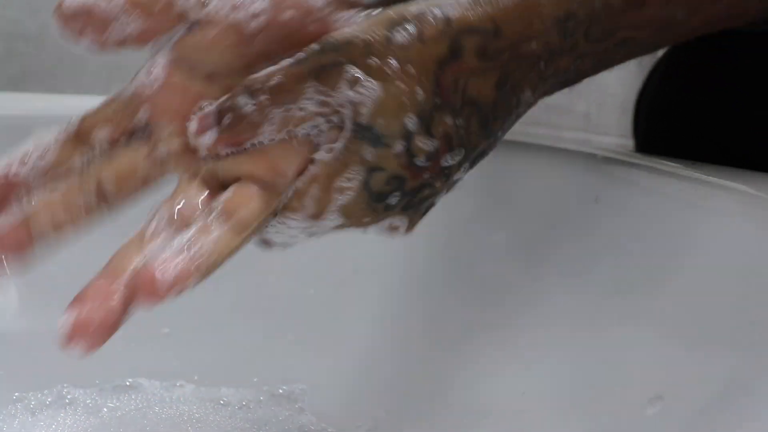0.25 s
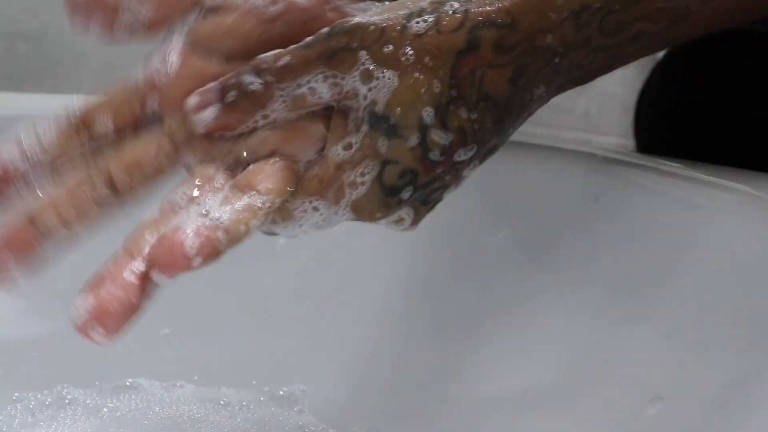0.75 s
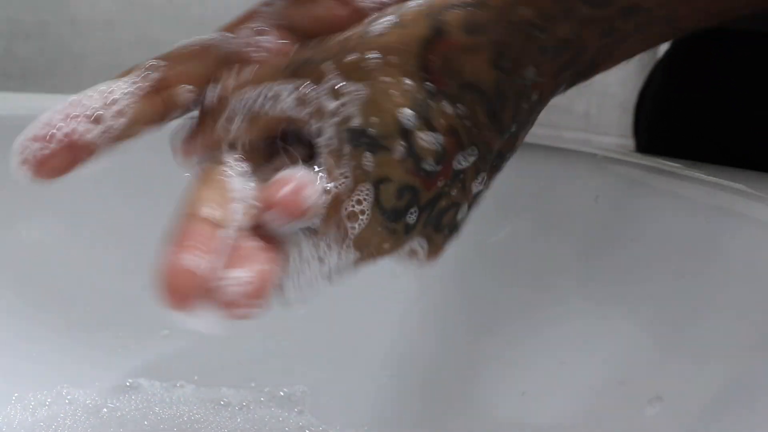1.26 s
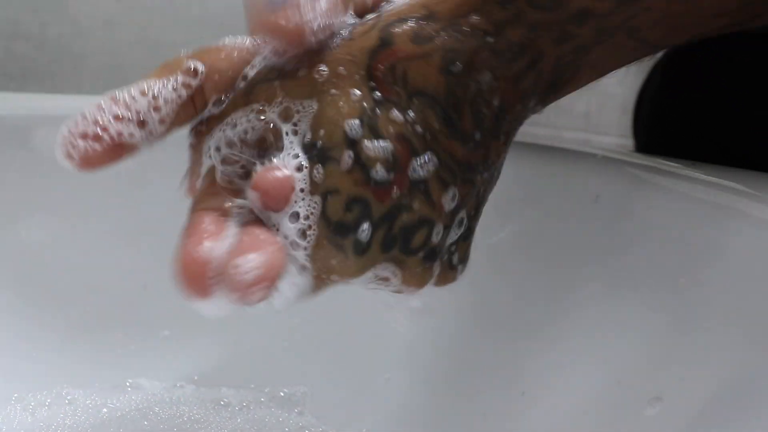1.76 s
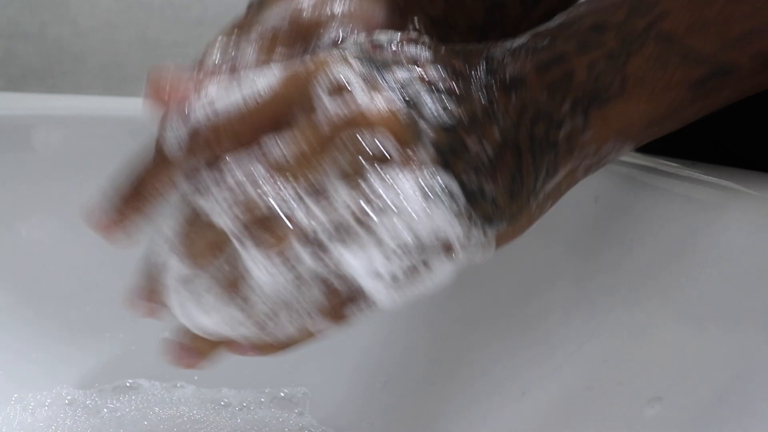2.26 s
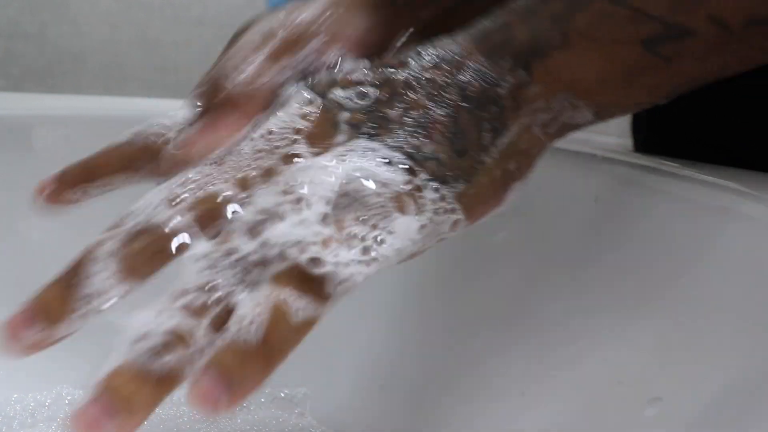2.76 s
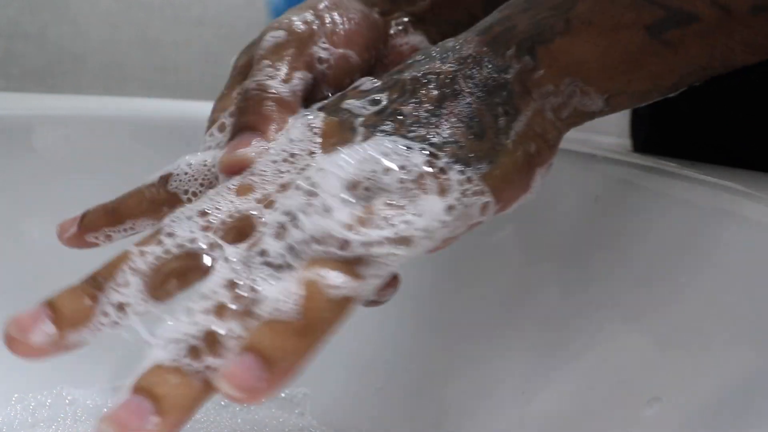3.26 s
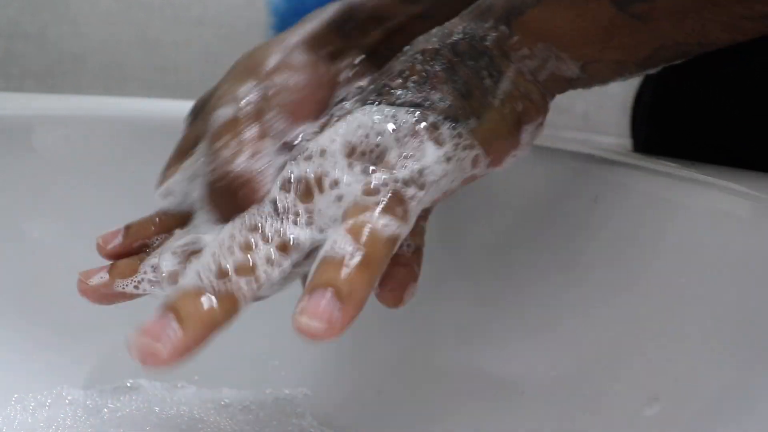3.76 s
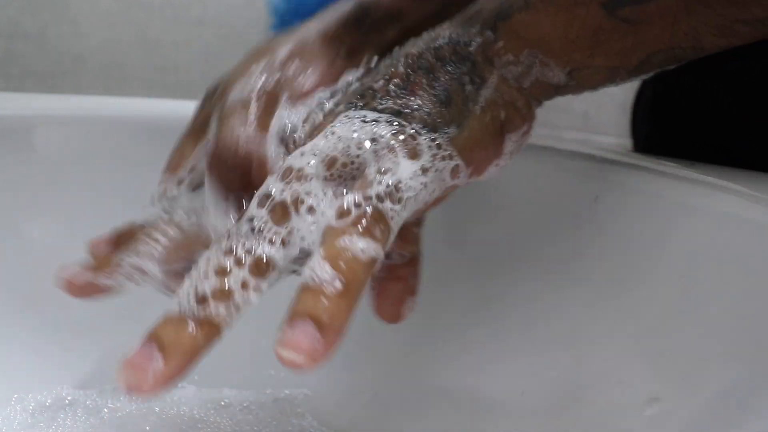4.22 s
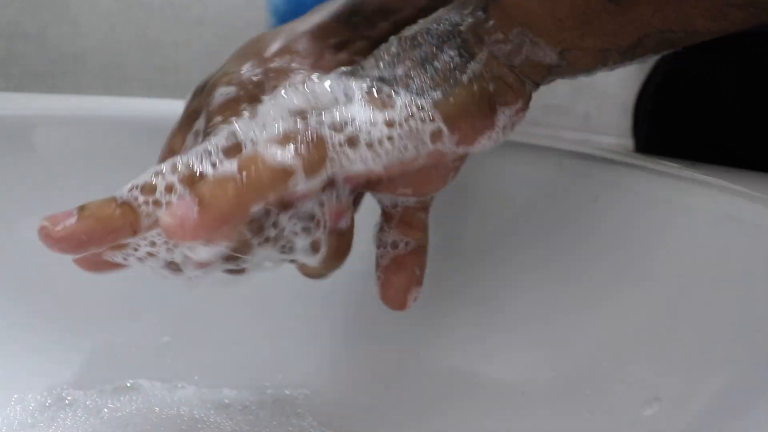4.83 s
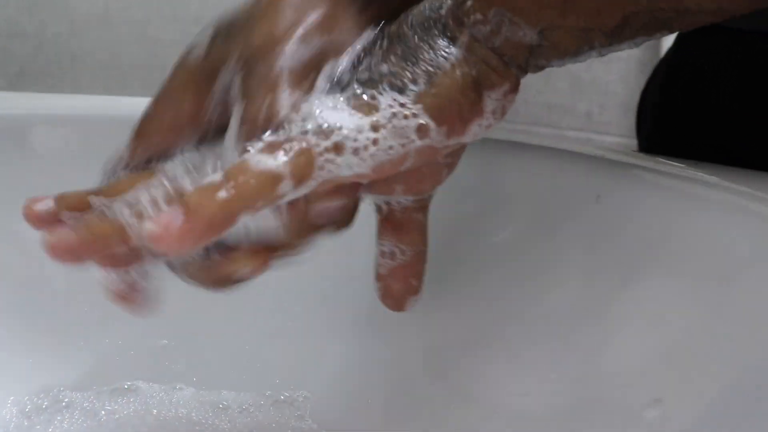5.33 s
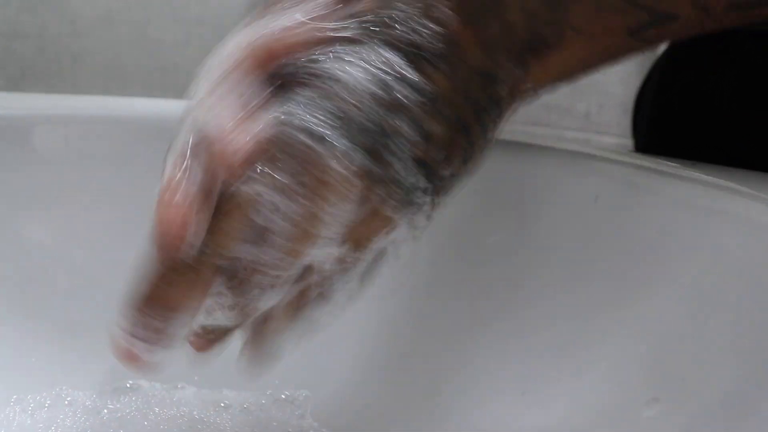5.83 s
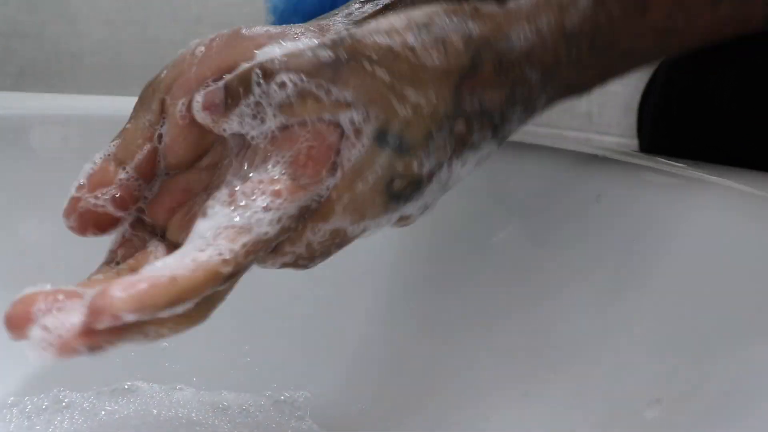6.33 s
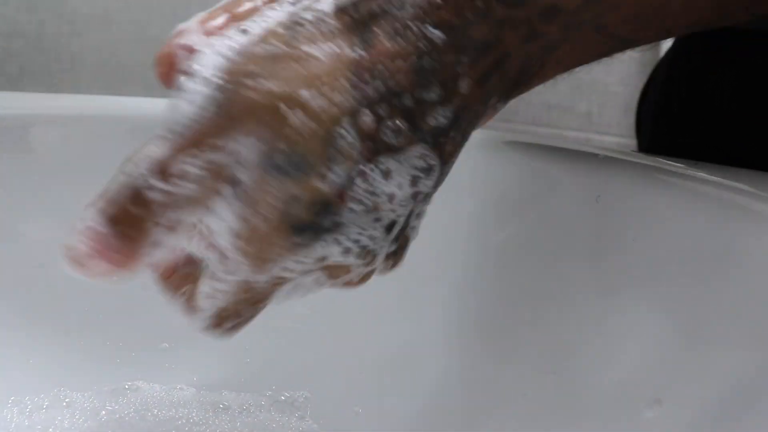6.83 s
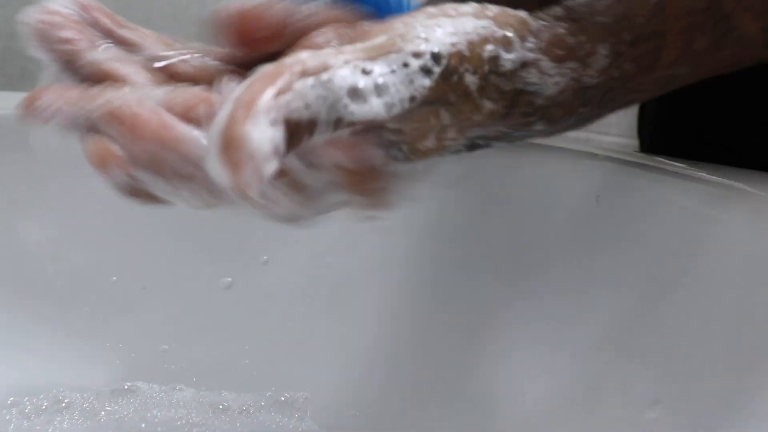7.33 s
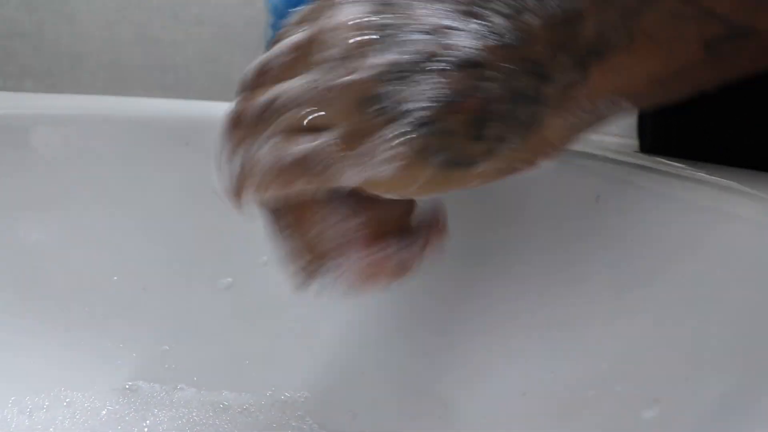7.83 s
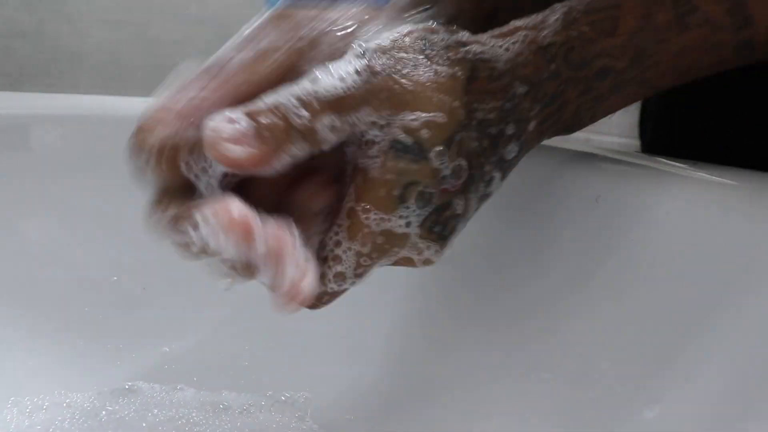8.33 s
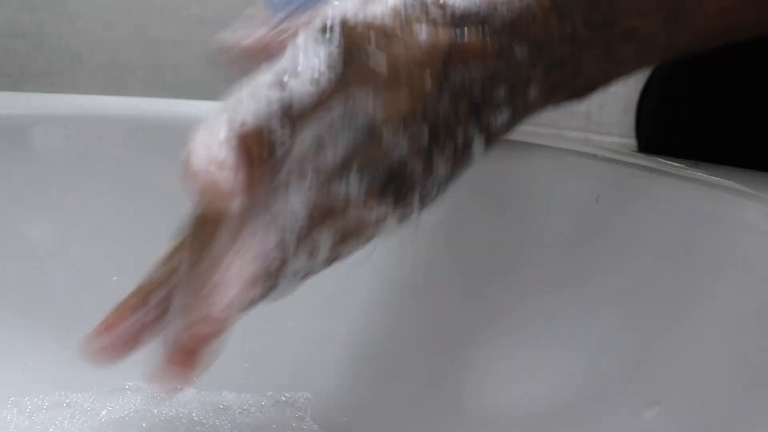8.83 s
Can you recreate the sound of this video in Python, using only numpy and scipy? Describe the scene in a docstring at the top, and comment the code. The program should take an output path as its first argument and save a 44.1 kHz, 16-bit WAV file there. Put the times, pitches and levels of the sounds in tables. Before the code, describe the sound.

Wet skin slides on skin, thick with foam. At first isolated loud squelchy pops stand out over light fizzing rubs, then a cluster of squishes mid-way, and finally fast, stronger scrubbing strokes with dense swish and hollow palm gurgles. Close microphone, with occasional low soft puffs of air, slight basin resonance, a short bright room and a barely audible hum.

```python
"""Soapy hand washing

Wet, soapy hands rub together over a washbasin, close to the microphone.
Air pockets between palms and fingers burst in short squelches: volleys of clicks ring resonators.
Stroke force sets the level of crackling lather, swishing skin and small random pockets; strokes grow
brisk in the last third. Noise puffs waft at the microphone; basin and small hard room ring over a quiet hum.
"""
import sys
import numpy as np
from scipy import signal
from scipy.fft import rfft, irfft, next_fast_len
from scipy.io import wavfile
from scipy.ndimage import map_coordinates

SR = 44100
rng = np.random.default_rng(int(sys.argv[2]) if len(sys.argv) > 2 else 0)


def master(y):
    """Save y as 16-bit WAV."""
    cut = np.clip(np.atleast_2d(y).T, -1, 1)
    pcm = np.round(cut * 32767)  # scale
    wavfile.write(sys.argv[1], SR, pcm.astype(np.int16))


N = 400428

# one hand sliding over the other: (middle [s], length [s], force [dB], brightness [dB])
STROKE_TABLE = [(.005, .025, -41, -0.5), (0.206, .15, -47.5, -0.5), (0.493, .11, -48, -2),
                (.67, 0.025, -47, -9), (0.774, 0.057, -44.5, 3.5), (.98, .05, -49.5, 2),
                (1.169, 0.11, -47, -9), (1.432, .17, -45.5, -3.5), (1.675, 0.089, -47, -3),
                (1.852, 0.12, -45, -3.5), (1.973, .025, -49.5, -15), (2.153, 0.1, -57, -1.5),
                (2.339, .04, -45.5, -6.5), (2.455, 0.049, -44.5, -1.5), (2.647, .08, -59.5, -8),
                (2.867, .04, -46, -3.5), (3.232, 0.062, -54.5, -4), (3.463, 0.13, -60.5, -3.5),
                (3.631, .06, -52.5, -1), (3.737, 0.0338, -43.5, -11.5), (3.986, 0.062, -49, -5),
                (4.168, .04, -44.5, -12), (4.517, 0.039, -38.5, -12), (4.681, 0.16, -47.5, -9),
                (4.835, 0.07, -48, -1.5), (5.111, .1, -48.5, -5), (5.272, 0.14, -58, 0),
                (5.615, 0.026, -59, 5), (5.742, .07, -50.5, 2.5), (5.899, 0.068, -51.5, 4),
                (5.942, 0.027, -38.5, 4), (6.103, 0.14, -53.5, 1), (6.309, .06, -40.5, 1.5),
                (6.541, 0.077, -47, 0.5), (6.787, .1, -36, -2), (7.079, .13, -38.5, -3.5),
                (7.307, .09, -44.5, -2), (7.445, .07, -46, -0.5), (7.53, .08, -52.5, 0),
                (7.635, .06, -39, -3.5), (7.726, .08, -38.5, -1), (7.874, .09, -39.5, -1.5),
                (7.953, .05, -36.5, -8), (8.082, .17, -41.5, -5.5), (8.245, .12, -38.5, -3),
                (8.496, .055, -36, -1), (8.638, .085, -42, -0.5), (8.788, 0.049, -40.5, -1.5),
                (8.913, 0.03, -34.5, -3.5), (9.033, 0.057, -40.5, -2.5)]
# relative spectrum of moving air: (frequency [Hz], density [dB])
PUFF_SPECTRUM = [(15, -12), (40, -14), (90, -6), (170, 1), (280, -12), (450, -6), (900, -41)]
# relative spectrum of a snapping film: (frequency [Hz], density [dB])
TICK_SPECTRUM = [(300, -31), (900, 12.5), (2500, -9), (4200, 3), (8500, 12), (10000, -6), (16000, -21)]


def amp(db):
    """Decibels to gain."""
    return 10 ** (np.asarray(db) / 20)


def unit(x):
    """Scale to rms 1."""
    return x / np.sqrt(np.mean(x ** 2) + 1e-20)


def along(points, hz):
    """Interpolate (Hz, value) points on a log frequency axis."""
    f, v = np.transpose(points)
    return np.interp(np.log(hz + 1), np.log(f + 1), v)


def wobble(knots_per_s):
    """Smooth random curve: spline through normal draws."""
    knots = rng.standard_normal(int(N * knots_per_s / SR) + 4)
    return map_coordinates(knots, [np.arange(N) * knots_per_s / SR])


def filtered(x, response):
    """Multiply the zero-padded spectrum of x by a function of frequency."""
    n = x.shape[-1]
    padded = 2 * next_fast_len(n // 2 + min(n, 8192))
    return irfft(rfft(x, padded) * response(np.fft.rfftfreq(padded, 1 / SR)), padded)[..., :n]


def colour(points):
    """Minimum-phase, hence causal, response with the given (Hz, dB) spectrum."""
    def response(hz):
        cepstrum = irfft(np.log(amp(along(points, hz))))
        # fold negative time onto positive time
        cepstrum[1:len(hz) - 1] *= 2
        cepstrum[len(hz):] = 0
        return np.exp(rfft(cepstrum))
    return response


def shaped_noise(spectrum):
    """Steady noise with the given (Hz, dB) spectrum, rms 1."""
    return unit(filtered(rng.standard_normal(N), lambda hz: amp(along(spectrum, hz))))


def resonance(hz, centre_hz, width_hz):
    """Causal band-pass resonance, peak gain 1."""
    return 1j * hz * width_hz / (centre_hz ** 2 - hz ** 2 + 1j * hz * width_hz)


def add(track, sound, start_s):
    """Mix a sound into the track."""
    start = max(round(start_s * SR), 0)
    part = track[start:start + len(sound)]
    part += sound[:len(part)]


def swell(level_db, middle_s, length_s, step=64):
    """Gain per sample of overlapping bell-shaped swells; length is full width at half power."""
    t = np.arange(0, N + step, step)[:, None] / SR
    bells = .5 ** ((2 * (t - middle_s) / length_s) ** 2)
    power = np.sum(amp(level_db) ** 2 * bells, axis=1)
    return np.interp(np.arange(N) / SR, t[:, 0], np.sqrt(power))


def background(air_db, hum_db):
    """Still room air, also ringing the basin, and a faint 120 Hz mains hum of wandering phase."""
    # relative spectrum of the quiet room: (frequency [Hz], density [dB])
    air_spectrum = [(20, -1.5), (45, -2), (170, -3), (300, -2.5), (500, -9.5), (1300, -14), (4000, -18),
                    (8000, -18), (15000, -22.5)]
    air = shaped_noise(air_spectrum)
    hum = unit(np.sin(2 * np.pi * 120 * np.arange(N) / SR + .25 * wobble(3.78)))
    return amp(air_db) * (air + amp(-1.5) * basin(air)) + amp(hum_db) * hum


def room(x, build_s, count=24):
    """Hard walls: a decaying noise tail, redrawn for each of count spans as the hands move."""
    # reverberation: (frequency [Hz], 60 dB decay time [s])
    decay_times = [(150, 1), (400, 0.23), (1000, 0.42), (2300, 0.23), (6000, 0.26), (14000, 0.18)]
    out = np.zeros(N)
    edges = np.linspace(0, N, count + 1).astype(int)
    for start, end in zip(edges, edges[1:]):
        hz, t, z = signal.stft(rng.standard_normal(SR // 2), SR, nperseg=256)
        decay = amp(-60 * t / along(decay_times, hz)[:, None])
        tail = signal.istft(z * decay, SR, nperseg=256)[1]
        tail *= 1 - np.exp(-np.arange(len(tail)) / SR / build_s)
        add(out, signal.fftconvolve(x[start:end], tail / np.linalg.norm(tail)), start / SR)
    return out


def basin(x):
    """The bowl under the hands: parallel resonances at a few pitches."""
    # bowl modes: (frequency [Hz], width [Hz], relative level [dB])
    modes = [(352.7, 7.4, 4), (431, 37, -0.5), (625.6, 16.4, 1), (835, 30, 0.5), (1123, 58, -1)]
    return filtered(x, lambda hz: sum(amp(db) * resonance(hz, centre, width) for centre, width, db in modes))


def wafted_air():
    """Wider sweeps push air at the microphone: low noise in swells."""
    # puffs: (middle [s], length [s], relative level [dB])
    puff_events = [(0.214, 0.043, -56), (1.943, 0.014, -59), (2.468, 0.059, -56), (2.864, .03, -53),
                   (4.805, 0.42, -56), (5.97, 0.063, -55), (6.83, 0.049, -48), (7.344, 0.064, -58),
                   (8.124, 0.303, -50), (8.366, 0.018, -37), (8.693, 0.024, -46)]
    middle_s, length_s, level_db = np.transpose(puff_events)
    return swell(level_db, middle_s, length_s) * shaped_noise(PUFF_SPECTRUM)


def crackle(spectrum, pops_per_s, spread_db, clump_db, smooth):
    """Tiny bubbles popping in clumps over the smooth hiss of sliding skin; rms 1."""
    sizes = amp(spread_db * np.clip(rng.standard_normal(N), -3, 2.4))
    clumps = amp(clump_db * wobble(90))
    pops = (rng.random(N) < pops_per_s / SR) * rng.choice([-1, 1], N) * sizes * clumps
    smooth = np.clip(smooth, 0, 1)  # power share of the hiss
    source = np.sqrt(1 - smooth) * unit(pops) + np.sqrt(smooth) * rng.standard_normal(N)
    return unit(filtered(source, lambda hz: amp(along(spectrum, hz))))


def bubbles(pitch_hz, scatter_octaves, cycles, spread_db, count=2600, size=400):
    """Foam cells bursting, each a tiny decaying sine at its own pitch; rms 1."""
    when = rng.random((count, 1))
    tune, force = rng.standard_normal((2, count, 1))
    hz = np.minimum(pitch_hz * 2 ** (scatter_octaves * tune), SR / 4)
    phase = hz * np.arange(size) / SR  # in cycles
    rings = np.sin(2 * np.pi * phase) * phase * np.exp(-phase / cycles)
    rings *= amp(spread_db * np.minimum(force, 2))
    index = (when * N).astype(int) + np.arange(size)
    return unit(np.bincount(index.ravel(), rings.ravel(), N)[:N])


def stroke_gains():
    """Rub, lather and swish gains: foam follows the force fully, the hollow rub only in part."""
    usual_force_db, usual_rub_db, rub_db_per_force_db = -46, -51, 0.22
    middle_s, length_s, force_db, bright_db = np.transpose(STROKE_TABLE)
    rub_db = usual_rub_db + rub_db_per_force_db * (force_db - usual_force_db)
    return [swell(db, middle_s, length_s) for db in (rub_db, force_db, force_db + bright_db)]


def hollow_rub():
    """Large bubbles gurgle in the palm under a low crackle."""
    # relative spectrum of the rub: (frequency [Hz], density [dB])
    rub_spectrum = [(60, -45), (150, -1), (300, 1), (550, -6), (1000, 0), (1500, -11), (3000, -45)]
    gurgle = bubbles(pitch_hz=700, scatter_octaves=0.315, cycles=2.5, spread_db=0, count=900)
    rasp = crackle(rub_spectrum, pops_per_s=770, spread_db=-2.5, clump_db=9.0, smooth=0.25)
    return amp(-4.0) * gurgle + 0.46 * rasp


def lather_foam(lather_db, bubble_db, tick_db):
    """Foam crackles, its cells ring, and now and then a larger film snaps with a tick."""
    # relative spectrum of the foam: (frequency [Hz], density [dB])
    foam_spectrum = [(500, -1), (1000, -10), (1500, -1.5), (2400, 7), (3300, 5), (4500, -2.5),
                     (8000, -27.5)]
    pops = crackle(foam_spectrum, pops_per_s=630, spread_db=0.5, clump_db=-2, smooth=0.14)
    cells = bubbles(pitch_hz=2597, scatter_octaves=0.516, cycles=1.74, spread_db=3.0)
    ticks = crackle(TICK_SPECTRUM, pops_per_s=75, spread_db=9.5, clump_db=-5.5, smooth=0)
    return amp(lather_db) * pops + amp(bubble_db) * cells + amp(tick_db) * ticks


def skin_swish(swish_db, bubble_db):
    """Sliding skin hisses in the treble while the finest foam cells ring."""
    # relative spectrum of the swish: (frequency [Hz], density [dB])
    swish_spectrum = [(2000, 0), (3500, -16), (4600, 2), (6500, -0.5), (8500, 4.5), (10000, -11),
                      (13000, -5.5), (16000, -21)]
    hiss = crackle(swish_spectrum, pops_per_s=990, spread_db=4.5, clump_db=5.5, smooth=0.67)
    cells = bubbles(pitch_hz=5230, scatter_octaves=0.39, cycles=3.4, spread_db=-2)
    return amp(swish_db) * hiss + amp(bubble_db) * cells


def rubbing(rub_db, lather_db, bubble_db, tick_db, swish_db, puff_db):
    """Hands slide on lather: rub, foam and swish swell with every stroke, beside puffs of air."""
    catch_db, smooth_force_db = 4, -38.5  # light strokes stutter; above this force they glide
    rub, lather, swish = stroke_gains()
    # the skin catches and slips
    grip = amp(catch_db * wobble(45) / (1 + (lather / amp(smooth_force_db)) ** 2))
    sliding = rub * amp(rub_db) * hollow_rub()
    sliding += lather * lather_foam(lather_db, bubble_db, tick_db)
    sliding += swish * skin_swish(swish_db, bubble_db - 0.5)
    # lone films snap even in the lightest strokes
    strays = amp(-9.5) * crackle(TICK_SPECTRUM, pops_per_s=25, spread_db=-3.5, clump_db=-4.5, smooth=0)
    return grip * sliding + rub * strays + amp(puff_db) * wafted_air()


def ruptures(length_s, spread_db, films_per_s, lead, lead_db, size=3072, order=3):
    """Soap films tear in a volley of uneven clicks: a lead-in, a sudden burst, a few stragglers."""
    count = 12 + int(length_s * films_per_s)
    delay = rng.gamma(order, 1 / order, size)[:count] - 1  # skewed scatter around the middle
    early = np.arange(count) % 5 == 0  # every fifth click belongs to the lead-in
    when = np.clip(size / 2 + length_s * SR * (.38 * delay - lead * early), 0, size - 1)
    force = rng.choice([-1, 1], size) * amp(spread_db * rng.standard_normal(size))
    return np.bincount(when.astype(int), force[:count] * amp(lead_db * early), size)


def pocket(pitch_hz, q, overtone_db, muffle_hz):
    """Air trapped between wet skin: a main ring and two overtones, dulled by the soft walls."""
    def response(hz):
        main, second, third = (resonance(hz, k * pitch_hz, k * pitch_hz / q) ** 2 for k in (1, 2, 3))
        walls = 1 + 1j * hz / muffle_hz - (hz / muffle_hz) ** 2
        return (main + amp(overtone_db) * (second + third)) / walls
    return response


def small_squelches(count=110):
    """Little pockets give way at random while a hand slides, louder under a harder, wetter stroke."""
    typical_hz, scatter_octaves = 2430, 0.5
    typical_s, q = 0.0032, 1.6
    over_force_db, spread_db = 2, 3.6
    wetness = 0.75  # dull strokes are the wet ones: dB gained per dB of brightness lost
    parts_db = np.array([0, -10.5, -11])  # pocket, spray, palm
    middle_s, length_s, force_db, bright_db = np.transpose(STROKE_TABLE)
    level_db = force_db + over_force_db - wetness * bright_db
    # longer strokes shed more pockets
    place = (np.arange(count) + rng.random(count)) / count
    stroke = np.searchsorted(np.cumsum(length_s) / length_s.sum(), place)
    events = []
    for k, (when, span, tune, size) in zip(stroke, rng.standard_normal((count, 4))):
        time_s = middle_s[k] + 0.27 * length_s[k] * when
        pitch_hz = typical_hz * 2 ** (scatter_octaves * tune)
        levels_db = level_db[k] + spread_db * size + parts_db
        events.append((time_s, typical_s * 2 ** (.5 * span), pitch_hz, q, *levels_db))
    return events


def squelches(pocket_db, spray_db, palm_hz, palm_width_hz, glide_octaves):
    """Each volley rings a trapped air pocket, throws a fine spray and thumps the hollow of the palm."""
    # loud air pockets: (middle [s], length [s], pitch [Hz], Q [1],
    # relative levels of pocket [dB], spray [dB], cupped palm [dB])
    loud_pockets = [(.078, 0.0097, 2600, 1.1, -13, -20.5, -39.5), (.131, 0.0042, 2340, 1.5, -35, -33, -39),
                    (.149, 0.0025, 2360, 2.3, -16, -46, -41), (0.182, 0.0088, 1790, 0.59, -28, -31.5, -41),
                    (.279, 0.0077, 2040, 1.9, -42, -44, -40), (.438, 0.017, 477, 1.3, -36, -47, -55),
                    (.459, 0.013, 454, 0.7, -36.5, -38, -61), (0.488, .011, 480, 0.97, -42.5, -50, -53),
                    (0.529, 0.036, 2330, 1.17, -30.5, -46, -39), (.685, 0.0037, 2710, 7.5, -37, -43.5, -45),
                    (0.725, 0.0024, 3400, 4.2, -32, -29, -55), (.792, 0.0025, 2150, 2.3, -23, -43, -39),
                    (1.103, 0.0071, 2480, 1.1, -35.5, -42.5, -50),
                    (1.129, .012, 2050, 0.77, -36.5, -39.5, -46.5),
                    (1.175, 0.0098, 1610, 0.72, -35, -50, -50), (1.305, 0.011, 2620, 3.9, -13.5, -21, -40),
                    (1.657, 0.016, 4030, 2.3, -27, -30.5, -45.5),
                    (1.677, 0.021, 4170, 2.1, -30, -26, -43.5), (1.773, 0.0093, 2237, 13, -11, -25, -39),
                    (1.875, 0.02, 1790, 1.1, -37, -56, -43.5), (1.892, 0.0089, 1574, 5.15, -28, -43.5, -36),
                    (2.341, 0.0071, 1750, 2.8, -28, -37.5, -55),
                    (2.494, .008, 1740, 1.6, -39, -37.5, -45.5), (2.821, 0.012, 710, 3.3, -36, -59, -42),
                    (3.051, 0.0074, 2170, 1.7, -34.5, -48.5, -37.5),
                    (3.479, 0.009, 1080, 1.1, -37, -60, -65), (3.818, 0.011, 2700, 0.88, -16, -18, -19),
                    (4.153, 0.02, 1680, 0.75, -33.5, -39, -41.5),
                    (4.186, 0.0098, 2420, 1, -23.5, -55, -29.5), (4.217, 0.0066, 1800, 0.48, -21, -29, -65),
                    (4.253, 0.003, 3060, 1.5, -20.5, -30.5, -40),
                    (4.322, 0.0086, 1750, 0.48, -27, -70, -46), (4.353, .014, 1900, 0.78, -17.5, -45, -37),
                    (4.654, 0.011, 2480, 1.2, -26.5, -39, -41),
                    (4.839, .012, 3570, 0.66, -22.5, -22.5, -33),
                    (4.972, 0.0082, 1560, 0.66, -27.5, -38, -55),
                    (4.987, 0.011, 3020, 0.92, -17.5, -21.5, -27.5),
                    (5.352, 0.0028, 2900, 0.73, -29, -39, -41),
                    (5.418, 0.0072, 2050, 0.65, -17, -32, -35.5), (5.96, 0.0031, 1350, 2.6, -28, -26, -39),
                    (5.96, 0.0034, 13300, 3.7, -25, -57, -55),
                    (5.977, 0.013, 2480, 0.67, -31, -31.5, -41.5), (6.083, .008, 3160, .9, -44, -41.5, -49),
                    (6.123, .03, 633, 1.5, -54.5, -67, -62), (6.207, .005, 10000, 2, -44, -45, -55),
                    (6.333, 0.003, 3180, 4, -35, -26, -30), (6.467, 0.0016, 2880, 1.2, -29, -41, -35.5),
                    (6.553, 0.017, 2750, 0.78, -26.5, -31, -40.5),
                    (6.72, 0.012, 1520, 0.62, -25.5, -20.5, -46), (6.731, 0.0061, 7000, 1.1, -26, -40, -55),
                    (6.75, 0.0097, 2380, 5.2, -30, -31, -62), (6.836, .022, 480, 1.5, -30.5, -44, -56),
                    (6.958, 0.0054, 1780, 1.3, -27.5, -44, -59), (7.059, 0.013, 522, 3.3, -36.5, -58, -60),
                    (7.134, 0.0052, 2030, .45, -30, -48, -48),
                    (7.189, 0.0088, 2200, 2.2, -29.5, -51, -37.5),
                    (7.429, 0.0067, 1490, 3, -36.5, -57, -58), (7.491, 0.015, 2500, 0.73, -37.5, -48, -46),
                    (7.6, 0.011, 3270, 5, -44, -32.5, -57), (7.652, 0.0079, 3440, 0.83, -24, -31, -44),
                    (7.736, 0.0041, 3800, 0.44, -33, -26, -53),
                    (7.884, 0.0075, 2180, 0.55, -26.5, -49, -64), (7.993, 0.019, 830, 0.55, -29, -51, -49),
                    (8.235, .025, 2550, 0.85, -22.5, -42, -26), (8.252, 0.01, 2260, 0.58, -22.5, -34, -54),
                    (8.366, .007, 1010, 3.8, -34, -46, -28), (8.51, .008, 3130, 3.3, -34, -49, -32.5),
                    (8.672, 0.0068, 2340, 1.6, -21, -47, -30), (8.8, 0.015, 1440, 0.35, -27, -35, -48),
                    (8.82, 0.0076, 2260, 3.3, -28.5, -22, -39), (8.942, 0.014, 2880, 3.5, -31, -43, -38),
                    (9.002, .017, 668, 1.25, -35, -46, -55), (9.037, 0.011, 1600, 0.96, -25.5, -47, -47),
                    (9.051, 0.015, 1360, 3.7, -37, -28, -46)]
    # relative spectrum of the spray: (frequency [Hz], density [dB])
    spray_spectrum = [(200, -81), (500, -8.5), (2000, 6), (4000, 14.5), (8500, 8.5), (10000, -3.5),
                      (13000, -5.5), (16000, -16)]
    seal_db = 16  # tightly sealed pockets burst unannounced: lead-in lost per doubling of Q
    out = np.zeros(N)
    palm = lambda hz: resonance(hz, palm_hz, palm_width_hz) ** 2
    for middle_s, length_s, pitch_hz, q, ring_db, fizz_db, thump_db in loud_pockets + small_squelches():
        lead_db = -8.5 - seal_db * np.log2(max(q, 1))
        volley = ruptures(length_s, spread_db=2.0, films_per_s=3000, lead=0.25, lead_db=lead_db)
        middle = len(volley) // 2
        # the pocket shrinks as it empties, so late clicks ring higher than early ones
        late = np.arange(len(volley)) > middle
        ring = np.zeros(len(volley))
        for half, octaves in ((~late, -glide_octaves), (late, glide_octaves)):
            air = pocket(pitch_hz * 2 ** octaves, q, overtone_db=-42.5, muffle_hz=7000)
            ring += filtered(volley * half, air)
        layers = [(ring, ring_db + pocket_db),
                  (filtered(volley, colour(spray_spectrum)), fizz_db + spray_db),
                  (filtered(volley, palm), thump_db)]
        for sound, db in layers:
            # level is the rms over the event length
            level = amp(db) * np.sqrt(length_s * SR) / np.linalg.norm(sound)
            add(out, level * sound, middle_s - middle / SR)
    return out


def scene():
    """Hands, basin and room, heard almost alike in both channels."""
    hands = squelches(pocket_db=0.16, spray_db=2.5, palm_hz=669, palm_width_hz=640, glide_octaves=0.063)
    hands += rubbing(rub_db=-4, lather_db=-2.0, bubble_db=-5.5, tick_db=-14.0, swish_db=-2.5, puff_db=-0.5)
    near = hands + amp(-0.5) * basin(hands)
    mid = near + amp(-11.0) * room(near, build_s=0.00033) + background(air_db=-54, hum_db=-66)
    # the channels differ only by a faint low rumble
    rumble = filtered(rng.standard_normal(N), lambda hz: amp(along(PUFF_SPECTRUM, hz)) / (1 + hz / 120))
    side = amp(-77.5) * unit(rumble)
    return np.array([mid + side, mid - side])


def record(dry):
    """Round off the highest peaks, then cut everything above the band limit."""
    top_hz = 16050
    rounded = dry / (1 + np.abs(dry / .9) ** 6) ** (1 / 6)
    return filtered(rounded, lambda hz: hz < top_hz)


dry = scene()
out = record(dry)
master(out)
```